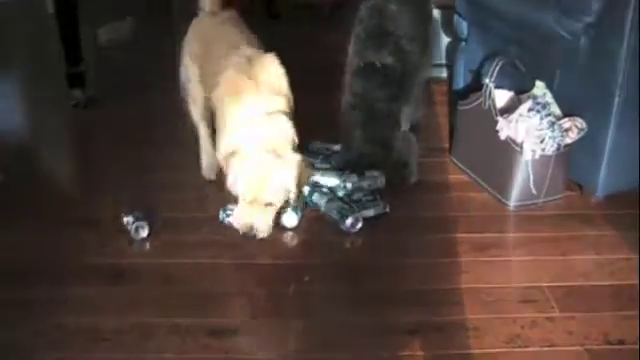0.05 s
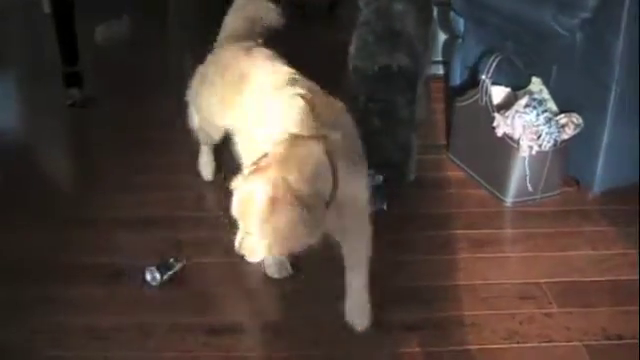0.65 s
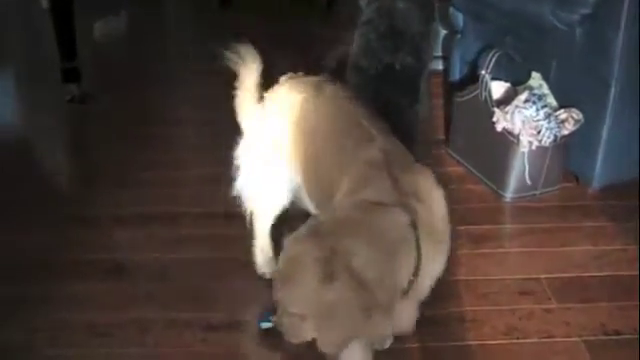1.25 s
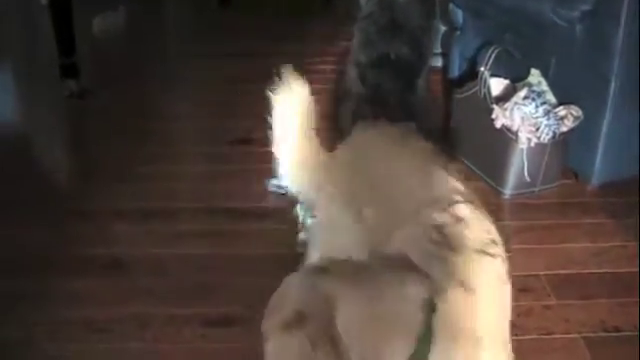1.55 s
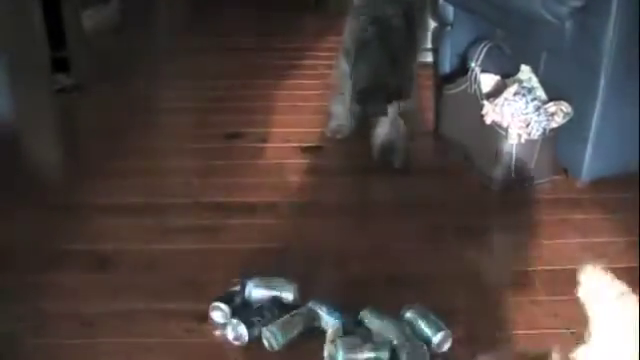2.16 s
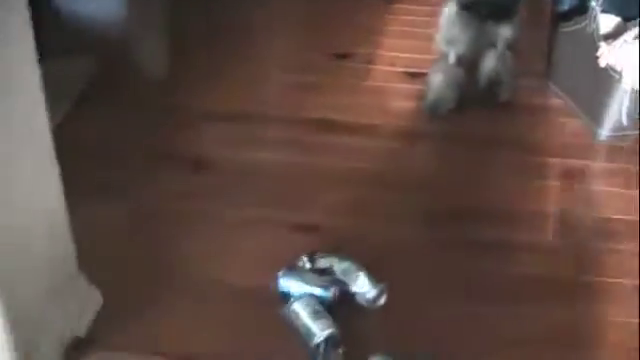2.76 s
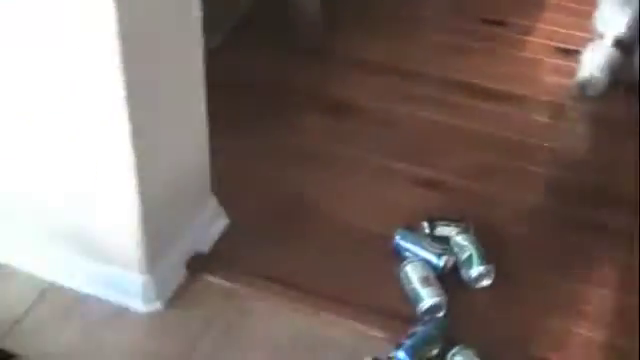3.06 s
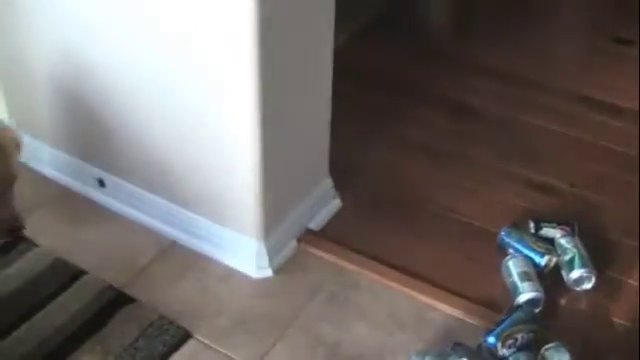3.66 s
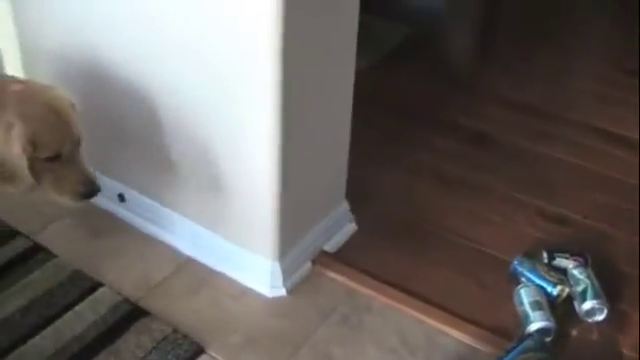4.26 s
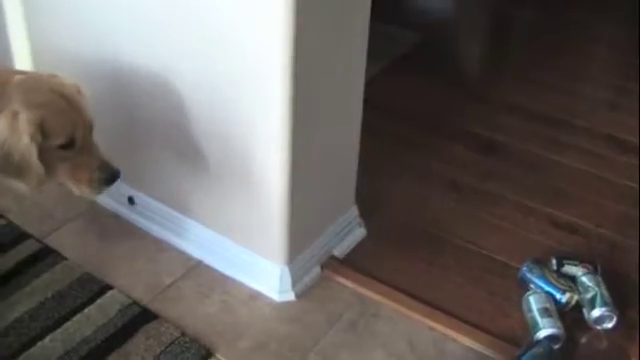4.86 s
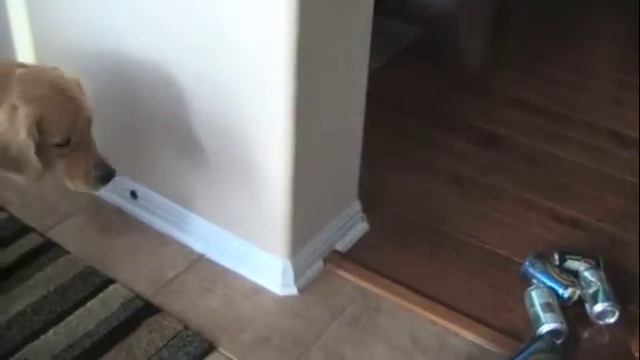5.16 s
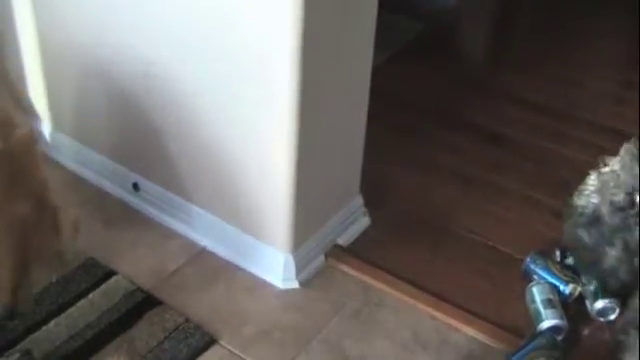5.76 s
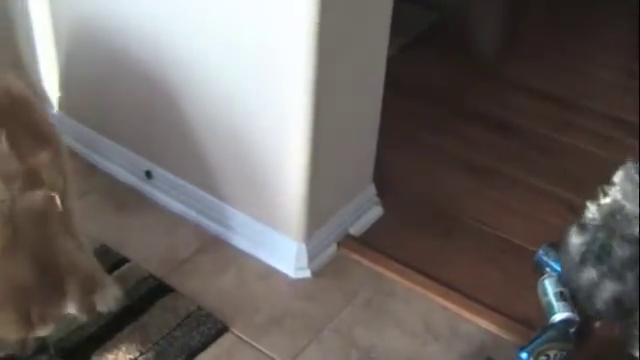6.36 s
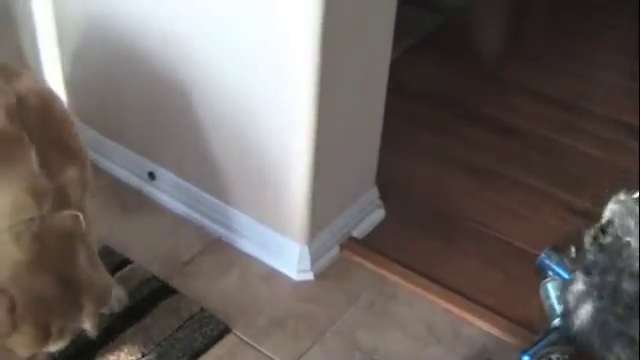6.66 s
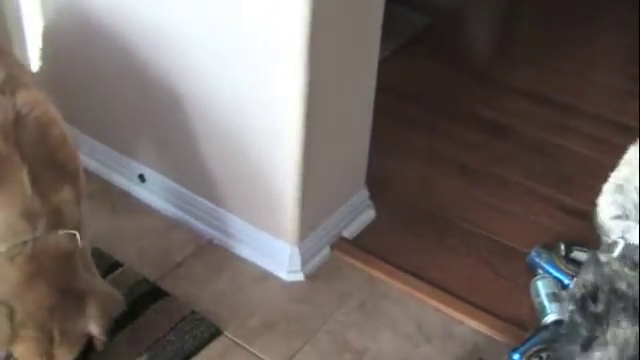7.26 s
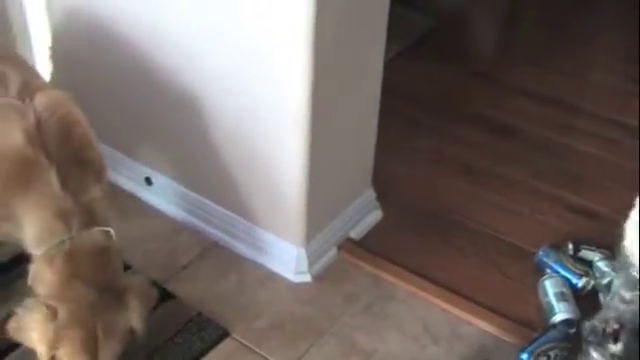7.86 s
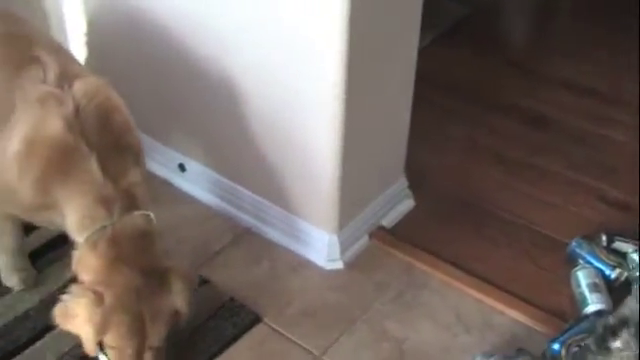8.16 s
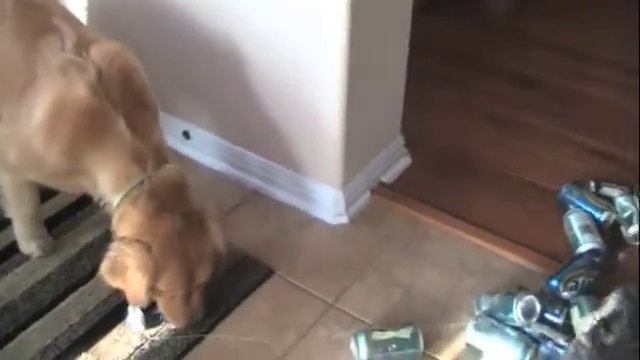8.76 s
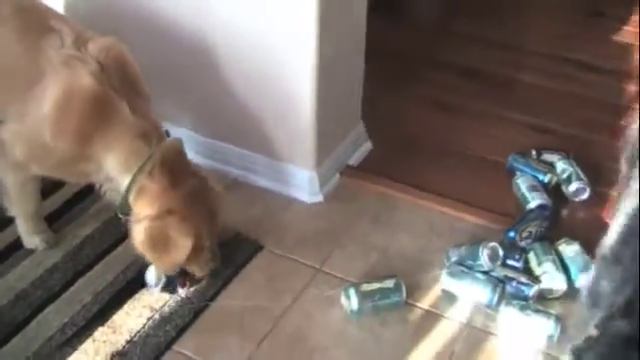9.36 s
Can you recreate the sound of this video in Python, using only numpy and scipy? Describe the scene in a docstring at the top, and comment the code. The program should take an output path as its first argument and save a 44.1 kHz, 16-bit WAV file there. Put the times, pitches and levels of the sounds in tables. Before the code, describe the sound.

A dog knocks empty aluminium cans clattering across a wooden floor; after a lull, single cans rattle and crunch as it chews.

```python
"""In a live room with a wooden floor, a dog ploughs through a heap of empty aluminium cans.
Each impact excites the damped modes of thin walls and stiff rims and thuds on the boards; the cans
tumble, scrape and settle. After a lull come soft paw steps; single cans are nudged into rocking or
buckle as they are chewed, and a few more topple. Diffuse reverberation follows every knock, and a small
camera with a limiter hears it all over ventilation noise and mains hum."""
import sys
import numpy as np
from scipy import signal
from scipy.fft import rfft, irfft, next_fast_len
from scipy.io import wavfile
from scipy.ndimage import uniform_filter1d, minimum_filter1d

SR = 44100
rng = np.random.default_rng(int(sys.argv[2]) if len(sys.argv) > 2 else 0)


def int16_out(signal):
    """Quantize to a 16-bit WAV file."""
    q = np.round(np.clip(np.atleast_2d(signal).T, -1, 1) * 32767)
    wavfile.write(sys.argv[1], SR, q.astype(np.int16))


N = 419391
TIME = np.arange(N) / SR

# distinct impacts: (time [s], level [dB], hardness [0 flat wall to 1 rim], relative floor thud [dB],
# wall frequency [Hz])
IMPACTS = [(0.0472, -13.5, 0.055, -15.5, 1150), (0.4349, -23, 0.25, -32, 940),
           (0.618, -25.5, 0.44, -17, 1220), (0.6272, -21, 0.12, -5, 1050), (0.6936, -17.5, 0.46, -17, 2410),
           (0.8207, -15.5, 0.43, -16, 1470), (0.954, -16, .15, -19, 1160), (1.0598, -18.5, 0.55, -17, 1200),
           (1.457, -20, 0.36, -17, 1180), (1.509, -15, 0.22, -8, 1020), (1.5605, -23, 0.69, -10, 834),
           (1.599, -13, 0.55, -13, 1170), (1.61, -7.5, 0.35, -18, 1660), (1.741, -14, 0.41, -13, 1090),
           (1.801, -14, 0.58, -10, 1506), (1.858, -11, 0.37, -12.5, 1040), (1.9176, -6.5, 0.35, -10, 1410),
           (1.946, -5, 0.25, -26, 3520), (1.969, -6, 0.33, -10.5, 1490), (1.992, -15, 0.69, -22, 2000),
           (2.0306, 0, 0.34, -14, 1820), (2.101, -10, 0.48, -27, 1720), (2.213, -4, 0.4, -23, 1600),
           (2.24, -11, 0.28, -23, 1900), (2.3245, -8.5, 0.57, -11, 1870), (2.38, -4.5, 0.47, -8, 1020),
           (2.391, -12, 0.74, -13, 1490), (2.408, -7, 0.43, -23, 1480), (2.464, -10, 0.5, -24, 2050),
           (2.513, -1, 0.44, -16, 1690), (2.564, -9, .42, -21, 1790), (2.5873, -4.5, 0.24, -16, 1360),
           (2.606, -3, 0.41, -20, 1500), (2.676, -9, 0.31, -9, 1450), (2.722, 1.5, 0.28, -17.5, 1600),
           (2.8261, -13, 0.16, -38, 1110), (2.9144, 1, 0.46, -17, 1150), (2.9938, -19.5, 0.94, -24, 1230),
           (3.002, -13, .42, -20, 1500), (3.0698, -15, 0.74, -17, 3270), (3.081, -4, 0.36, -9.5, 1150),
           (3.154, -11.5, 0.44, -8.5, 1142), (3.246, -15.5, 0.53, -31, 1210), (3.395, -24.5, 0.7, -25, 830),
           (3.423, -32.5, 0.8, -13, 1160), (3.5555, -34.5, 0.6, -24, 1490),
           (4.1916, -47.5, 0.69, -17, 3620), (4.5174, -55, 0.54, -6, 1730), (5.384, -56.5, 0.58, -8, 2390),
           (5.822, -49.5, 0.52, -9, 1960), (6.5781, -18.5, 0.53, -14, 2800), (6.73, -22, 0.27, -17, 616),
           (6.8959, -21, 0.35, -14, 2270), (7.0799, -28, 0.29, -9, 1290), (7.2022, -30, 0.37, -8, 740),
           (7.273, -30.5, 0.3, -16, 1100), (7.3538, -23, 0.084, -23, 796), (7.3721, -29, 0.81, -4, 3150),
           (7.412, -21.5, 0.74, -10, 1110), (7.4387, -15, 0.4, -7, 1400), (7.4594, -16.5, 0.56, -4, 1600),
           (7.4642, -29, 0.56, -19, 1950), (7.4952, -10.5, 0.43, -4, 1840), (7.6563, -9, 0.52, -11, 1740),
           (7.738, -24, 0.7, -17, 2060), (7.7855, -9.5, 0.42, -0.5, 1070), (7.7958, -28.5, 0.74, 13, 1240),
           (9.036, -39, 0.31, -28, 754), (9.1373, -54.5, 0.86, 1, 820)]
# cans that are dragged or bounce free: (time [s], frequency [Hz], level [dB], drag duration [s])
RINGS = [(0.0, 889, -11.5, 0), (0.701, 2580, -27, 0.084), (1.0, 1064, -20.5, 0.02),
         (1.14, 718, -18.5, 0.046), (1.185, 829, -15.5, 0.025), (1.29, 1118, -18, 0.031),
         (1.55, 816, -14.5, 0.034), (1.816, 2654, -12, .002), (1.925, 3450, -10, 0.0054),
         (2.0, 1508, -10.5, 0.015), (2.14, 548, -13.5, 0.013), (2.16, 1222, -12, .02),
         (2.214, 3330, -17, 0.0094), (2.245, 537, -8, 0.0014), (2.25, 3450, -17, 0.017),
         (2.465, 2080, -8, 0), (2.503, 3110, -11.5, 0.015), (2.611, 1101, -11, 0.093),
         (2.7, 7920, -13, 0.0017), (2.721, 2420, -9, 0), (2.724, 1240, -9.5, 0.021), (3.084, 559, -19, .02)]
# settling cans touch rim to rim: (time [s], level [dB])
RIM_TOUCHES = [(3.554, -18), (3.759, -22), (3.930, -28), (4.043, -40)]
# modes of the stiff rim: (frequency [Hz], level [dB])
RIM_RESONANCES = [(6700, -2), (7140, 2), (7810, -2), (8780, -1), (9300, -10)]
# the heap spills and is pushed twice more; one envelope a push, ahead of the band trims:
# (time [s], level [dB], relative floor rumble [dB], relative brightness [dB])
PUSH_ENVELOPES = [
    [(0, -11, -53, -9.5), (0.05, -12, -18.5, -7), (0.13, -21, -24, -9.5), (0.3, -23, -15, -9),
     (0.41, -31.5, -4, -9), (0.47, -24, -13, -11), (0.58, -34.5, -4, -8)],
    [(0.63, -22.5, -7, -2.5), (0.69, -20, -25, -6), (0.73, -18.5, -12, 0.5), (0.81, -20, -25, -1.5),
     (0.98, -20.5, -9.5, -1.5), (1.12, -12.5, -14, -3.5), (1.25, -16.5, -16, -8.5), (1.45, -18.5, -6.5, -3),
     (1.6, -13.5, -8, -0.5), (1.78, -11, -17, -0.5), (1.88, -13, -10, -2), (2.03, -12, -8, -0.5)],
    [(2.08, -14.5, -13, 2.5), (2.18, -8.5, -17, -6), (2.34, -10.5, -6.5, 2.5), (2.48, -8.5, -12.5, 1.5),
     (2.73, -8, -13, 1), (2.88, -9.5, -15, -2), (2.97, -6, -16, -2), (3.15, -7, -23.5, -3),
     (3.35, -24.5, -21.5, 1), (3.46, -31.5, -8, -3), (3.75, -44.5, -16, -4), (3.95, -63.5, -14, 13)],
]
# later jostles of a few cans, and two faint high swishes, perhaps the dog sniffing; the same columns
JOSTLES_AND_SWISHES = [
    [(4.09, -52.5, -5, 4), (4.17, -49, 2, 2), (4.23, -62, -7, -6)],
    [(6.16, -63, 0, 8), (6.22, -59, 0, 6.6)],
    [(6.38, -60.5, 0, 10.6), (6.45, -61, 0, 8)],
    [(7.16, -37.5, -4, -3.5), (7.412, -32, -2, -13), (7.544, -27, 0, -4), (7.792, -38, -14, 3),
     (7.93, -36, -7, -15)],
    [(8.18, -40.5, 0.5, 0.5), (8.264, -40.5, 8, 0), (8.33, -47, -4, -7)],
    [(9.18, -46.5, 3, -1), (9.296, -43, 3.5, 1.5), (9.5, -53, 3.4, -14)],
]
# air and wall modes of an empty can: (frequency [Hz], level [dB], t60 [s])
CAN_RESONANCES = [(251.6, -3.5, 0.044), (354, -12.5, 0.1), (418, -10.5, 0.073), (522.6, -2.5, 0.17),
                  (694, -4, 0.93), (850, 1, 0.52), (958, 5.5, 0.068), (1068, 6, 0.088), (1153, 0, 0.39),
                  (1263, 9.5, 0.06), (1472, 3, 0.11), (1644, -1, 0.11), (1946, -14, 0.17),
                  (2235, -6, 0.083), (2730, -7.5, 0.42), (3500, -3, 0.056), (5955, -8.5, 0.029),
                  (7190, -13, 0.012), (7670, -18, 0.019), (8120, -12, 0.037), (9120, -6, 0.084),
                  (9900, -41, 0.03)]
# spectrum of a collision's dry crack: (frequency [Hz], gain [dB])
CRACK_SPECTRUM = [(71, -56), (120, -52), (243, -13), (304, -22), (437, -9), (524, 5.5), (629, -0.5),
                  (802, 5), (1230, 6.5), (1800, -3.5), (3500, -9.5), (4840, -17.5), (6960, -15),
                  (9240, -19), (15000, -16.5)]
# a lone can rocks on its side: (time [s], level [dB], favoured frequency [Hz], t60 of the rocking [s])
ROCKINGS = [(6.578, -40, 1500, 0.018), (6.73, -28.5, 595, .04), (6.896, -27, 1500, .03),
            (7.08, -34.5, 1200, .05), (7.163, -39, 1100, .1), (7.203, -25.5, 780, 0.051),
            (7.235, -34, 850, .1), (7.268, -33, 900, 0.12)]
# modes of that can: (frequency [Hz], level [dB], t60 [s])
LONE_CAN_RESONANCES = [(503, 2, 0.18), (650, 3, 0.088), (755, 2.5, .18), (860, 7.5, 0.15), (965, -1, 0.044),
                       (1145, -4, .2), (1247, 2.5, 0.19), (1405, -3, .25), (2150, 0, .2), (2730, -6, .1),
                       (5200, 12, .4)]
# a can buckles in the jaws: (time [s], level [dB], rise [s], t60 [s], wall frequency [Hz],
# relative hollow body [dB], relative crackle [dB])
BITES = [(7.872, -21.5, .008, 0.12, 1400, -9, -8.5), (7.922, -24.5, 0.017, .09, 1300, -1.5, -9.5),
         (8.18, -33, .008, 0.086, 1700, -6, -9), (8.196, -25, .003, 0.075, 1500, 3.5, -10),
         (8.224, -24, .004, 0.046, 1640, -5.5, -7), (8.266, -33, .004, 0.048, 1700, -10, 1),
         (8.282, -33.5, 0.0066, 0.12, 1400, -8, -23), (8.429, -20, .001, 0.084, 1250, -7, -13),
         (8.492, -14, 0.014, 0.045, 1050, 1.5, -7), (8.528, -20, 0.0054, 0.14, 930, -7, -29),
         (9.18, -36.5, 0.044, 0.14, 1420, -3.5, -4), (9.343, -32.5, 0.0053, 0.13, 1390, -10, -2),
         (9.435, -39, .003, 0.074, 1590, -12, -12)]
# soft paw falls: (time [s], level [dB], thump frequency [Hz])
PAW_FALLS = [(6.04, -49, 231), (6.226, -48.5, 230), (7.787, -37.5, 190), (8.497, -42.5, 220),
             (9.279, -41, 390)]
# bands of the room's reverberation: (frequency [Hz], t60 [s], gain on the direct sound [dB])
REVERB_BANDS = [(150, 0.97, -5), (466, 0.71, -5.5), (990, 0.74, -0.5), (2620, 0.71, -3.5),
                (6700, 0.58, -1.5), (15700, 0.13, -1.5)]
# width of diffuse sound at the microphone pair: (frequency [Hz], side gain [dB])
DIFFUSE_WIDTH = [(100, -8), (500, -3), (1000, -2.5), (2000, 3.5), (4000, 4.5), (8000, 3.5), (12000, 13)]
# spectrum of ventilation noise and hiss: (frequency [Hz], gain [dB])
AIR_SPECTRUM = [(53, -47), (90, -6.5), (114, -9.5), (214, -1), (276, -1), (439, -8), (467, -1.5), (508, -8),
                (683, -11), (809, -14.5), (1880, -23), (4670, -28), (14000, -36.5)]
# mains harmonics: (frequency [Hz], rms level [dB])
HUM_PARTIALS = [(60, -54), (120, -59)]
# balance of the microphone pair: (frequency [Hz], left minus right [dB])
STEREO_BALANCE = [(250, -0.3), (1000, 0.6), (2000, 2), (4500, 0), (8000, 4.5), (12000, 1.3)]


def knock(thud_db, clank_db, tick_db, hz, t60, snap=3.4, soft_s=0.13, rim_hz=7700):
    """Forced vibration: a snap and a chatter of metal on wood drive the floor, thin wall and stiff rim."""
    t = np.arange(SR // 10) / SR
    force = rng.standard_normal(len(t)) * fade(t, t60)
    force[0] += snap * np.exp(-(t60 / soft_s) ** 2)  # only short, hard blows snap cleanly
    thud = unit(band(force, 349, 564))
    wall = unit(resonate(band(force, 535, 2650), hz, q=3))
    clank = unit(wall + undb(-3) * unit(band(force, 820, 2780)))
    rim = unit(resonate(band(force, 4000, 12000), rim_hz, q=3))
    tick = unit(unit(band(force, 4700, 15500, order=3)) + undb(-4) * rim)
    # levels are those of the knock's energy packed into 10 ms
    return (undb(thud_db) * thud + undb(clank_db) * clank + undb(tick_db) * tick) / np.sqrt(10)


def impact(db, hardness, thud_db, hz, rebound_s=0.0075, rebound_db=-8):
    """Contact stiffness: nearer the rim, a blow is shorter and brighter and rebounds more strongly."""
    flat_t60, rim_t60 = 0.2, 0.011
    flat_tick_db, rim_tick_db = -29.5, 16.5
    t60 = rim_t60 + (flat_t60 - rim_t60) * (1 - hardness) ** 4
    tick_db = flat_tick_db + (rim_tick_db - flat_tick_db) * hardness
    first, second = (knock(db + thud_db, db, db + tick_db, hz, t60) for _ in range(2))
    delayed = np.r_[np.zeros(int(rebound_s * SR)), second][:len(first)]
    return first + hardness * undb(rebound_db) * delayed


def ringing(hz, drag_s, roughness=1.2, waver=0.044, onset_s=0.004):
    """Friction sustains a wall mode, which then decays freely; rocking modulates it at random."""
    t = np.arange(SR // 2) / SR
    rocking = lowpass(rng.standard_normal((2, len(t))), np.clip(waver * hz, 5, 2000))
    phase = 2 * np.pi * hz * t
    sidebands = unit(rocking[0] * np.sin(phase) + rocking[1] * np.cos(phase))
    tone = unit(np.sin(phase) + roughness * sidebands)
    contact = np.sin(np.pi / 2 * np.minimum(t / onset_s, 1)) ** 2
    t60 = 0.15 * (1000 / hz) ** 0.16  # higher modes die sooner
    return tone * contact * fade(np.maximum(t - drag_s, 0), t60)


def rim_tap(t60=0.024, rise_s=0.00048, detune=0.025, scuff_db=-2):
    """Free vibration: a light scuff leaves the high modes of the stiff rim tinkling."""
    t = np.arange(SR // 5) / SR
    ring = 0
    for hz, db in RIM_RESONANCES:
        detuned = hz * (1 + detune * rng.standard_normal())
        ring += undb(db) * np.sin(2 * np.pi * (detuned * t + rng.random()))
    scuff = unit(band(rng.standard_normal(len(t)), 6300, 9800))
    return unit(unit(ring) + undb(scuff_db) * scuff) * fade(t, t60) * (1 - np.exp(-t / rise_s))


def can_response(dent=0.02183, crack_db=-1, crack_t60=0.11):
    """Modal superposition: a can's modes, weighted by where the blow lands, sound with a dry crack."""
    t = np.arange(SR // 4) / SR
    push, ring = signal.unit_impulse(len(t)), 0
    for hz, db, t60 in CAN_RESONANCES:
        shift, weight = rng.standard_normal(2)
        # dents and dregs detune each can, its higher modes most
        detuned = hz * (1 + dent * min(hz / 1000, 6) * shift)
        ring += undb(db) * np.tanh(weight) * mode(push, detuned, t60) / np.sqrt(t60)
    crack = colour(rng.standard_normal(len(t)) * fade(t, crack_t60), CRACK_SPECTRUM)
    return unit(ring) + undb(crack_db) * unit(crack)


def collisions(cans=130, hits_per_can=7, spread_db=4, restitution=0.6):
    """Inelastic collisions: each random hit is followed by ever quicker, weaker rebounds."""
    out = np.zeros(N)
    for _ in range(cans):
        response = can_response()
        for moment, softness, height in rng.random((hits_per_can, 3)):
            s = moment * N / SR
            strength = undb(-spread_db * np.log(softness + 0.19))
            gap_s = 0.012 + 0.05 * height
            for bounce in range(3):
                add(out, strength * restitution ** bounce * response, s)
                s += gap_s * restitution ** bounce
    return out


def heap(mid_trim_db=-4, low_trim_db=-4, high_trim_db=-3):
    """Incoherent summation: collisions merge; heavy shoves rumble the boards, hard ones are bright."""
    clatter = np.roll(collisions(), N // 2)  # the cans are already in motion at the start
    low = band(clatter, 153, 714, order=4)
    mid = band(clatter, 557, 2050, order=4)
    high = band(clatter, 2000, 10600, order=3)
    out = np.zeros(N)
    # kept faint and bright, the same texture also makes the two swishes
    for envelope in [*PUSH_ENVELOPES, *JOSTLES_AND_SWISHES]:
        s, db, rumble_db, bright_db = np.transpose(envelope)
        out += follow_level(mid, s, db + mid_trim_db)
        out += follow_level(low, s, db + rumble_db + low_trim_db)
        out += follow_level(high, s, db + bright_db + high_trim_db)
    return out


def rocking_can(centre_hz, rock_t60, width_octaves=0.64, gap_s=0.009, taps=14):
    """Impulse-train excitation: a can rocks in uneven, fading taps; the touch point favours some modes."""
    t = np.arange(SR // 2) / SR
    push, ring = signal.unit_impulse(len(t)), 0
    gaps, sizes = rng.random((taps, 2)).T
    at = np.minimum(np.cumsum(gap_s * (0.5 + gaps)) * SR, len(t) - 1).astype(int)
    push[at] += sizes * fade(t[at], rock_t60)
    for hz, db, t60 in LONE_CAN_RESONANCES:
        coupling = np.exp(-0.5 * (np.log2(hz / centre_hz) / width_octaves) ** 2)
        ring += undb(db) * coupling * mode(push, hz, t60)
    ring = band(ring, 400, 9000)  # so small a body radiates no bass
    return ring / np.std(ring[:SR // 50])


def crunch(rise_s, t60, hz, hollow_db, crackle_db, creases_per_s=3500, band_ratio=1.67):
    """Buckling: thin metal gives way in a swarm of tiny creases that sound the wall and hollow body."""
    t = np.arange(SR // 4) / SR
    bite = np.minimum(t / rise_s, 1) * fade(np.maximum(t - rise_s, 0), t60)
    creases = rng.standard_normal(len(t)) * (rng.random(len(t)) < creases_per_s / SR)
    wall = unit(band(creases, hz / band_ratio, hz * band_ratio, order=3))
    hollow = unit(band(creases, 330, 590, order=3))
    crackle = unit(band(creases, 1900, 6100, order=1))
    return bite * (wall + undb(hollow_db) * hollow + undb(crackle_db) * crackle)


def paw_step(hz, rise_s=0.0036, t60=0.046):
    """Compliant contact: a padded foot drives only the low frequencies of the boards."""
    t = np.arange(SR // 10) / SR
    push = rng.standard_normal(len(t)) * fade(t, t60) * (1 - np.exp(-t / rise_s))
    return unit(band(push, hz * 0.55, hz * 1.37))


def reflections(build_s=0.00077):
    """Frequency-dependent absorption: each band of a diffuse tail dies at its own rate."""
    t = np.arange(SR) / SR
    spectrum, hz = rfft(rng.standard_normal(SR)), np.fft.rfftfreq(SR, 1 / SR)
    centres, tail = np.transpose(REVERB_BANDS)[0], 0
    for (_, t60, db), pick in zip(REVERB_BANDS, np.eye(len(REVERB_BANDS))):
        noise = irfft(spectrum * along(hz, np.c_[centres, pick]), SR)
        decay = fade(t, t60) * (1 - np.exp(-t / build_s))
        tail += undb(db) * noise * decay / np.linalg.norm(decay)
    return tail


def room(direct, spots=4, move_hz=2.3, side_db=-8):
    """Reflections depend on source position, so they change as the cans move; returns mid and side."""
    mid = side = 0
    for spot in range(spots):
        # neighbouring spots hand over to each other at constant power
        here = direct * np.maximum(0, np.cos(2 * np.pi * (move_hz * TIME - spot / spots)))
        mid += signal.oaconvolve(here, reflections())[:N]
        side += signal.oaconvolve(here, reflections())[:N]
    return mid, undb(side_db) * colour(side, DIFFUSE_WIDTH)


def ventilation(air_db=-48.5, rumble_db=-68):
    """Diffuse noise: low ventilation sound and faint hiss, uncorrelated between mid and side."""
    mid, side = (undb(air_db) * unit(colour(rng.standard_normal(N), AIR_SPECTRUM)) for _ in range(2))
    rumble = undb(rumble_db) * unit(band(rng.standard_normal(N), 35, 107))
    return mid + rumble, colour(side, DIFFUSE_WIDTH)


def mains_hum(swell_s=1.055, crest_s=5.06, depth=0.17):
    """Amplitude modulation: the mains tone and its octave slowly swell and sink."""
    hum = sum(np.sqrt(2) * undb(db) * np.sin(2 * np.pi * hz * TIME) for hz, db in HUM_PARTIALS)
    return hum * (1 + depth * np.cos(2 * np.pi * (TIME - crest_s) / swell_s))


def undb(db):
    """Decibels to amplitude ratio."""
    return 10 ** (np.asarray(db) / 20)


def unit(x):
    """Normalisation to rms 1."""
    return x / np.sqrt(np.mean(x ** 2) + 1e-20)


def fade(t, t60):
    """Exponential decay, 60 dB down after t60 seconds."""
    return np.exp(-np.log(1000) * t / max(t60, 1e-3))


def add(out, x, s):
    """Superposition of x on out at time s."""
    i = int(np.clip(s * SR, 0, N - 1))
    out[i:i + len(x)] += x[:N - i]


def lowpass(x, hz, order=2):
    """Causal low-pass filtering."""
    return signal.sosfilt(signal.butter(order, hz, fs=SR, output="sos"), x)


def band(x, lo_hz, hi_hz, order=2):
    """Causal band-pass filtering."""
    return signal.sosfilt(signal.butter(order, [lo_hz, hi_hz], "band", fs=SR, output="sos"), x)


def resonate(x, hz, q):
    """Resonance of bandwidth hz / q."""
    return signal.lfilter(*signal.iirpeak(hz, q, fs=SR), x)


def mode(push, hz, t60):
    """Damped harmonic oscillator: each push sets off a decaying sine."""
    turn, keep = 2 * np.pi * hz / SR, fade(1 / SR, t60)
    return signal.lfilter([0, np.sin(turn)], [1, -2 * keep * np.cos(turn), keep ** 2], push)


def along(hz, points):
    """Log-frequency interpolation of (frequency [Hz], value) points."""
    f, value = np.transpose(points)
    return np.interp(np.log(hz + 1), np.log(f), value)


def colour(x, points, share=1):
    """Zero-phase filtering by a (frequency [Hz], gain [dB]) curve."""
    n = next_fast_len(len(x))
    gain = undb(share * along(np.fft.rfftfreq(n, 1 / SR), points))
    return irfft(rfft(x, n) * gain, n)[:len(x)]


def follow_level(x, s, db, smooth_s=0.11):
    """Envelope shaping: the running rms of x follows a curve and is silent outside its span."""
    power = uniform_filter1d(uniform_filter1d(x ** 2, int(smooth_s * SR)), int(smooth_s * SR / 2))
    target = np.interp(TIME, np.r_[s[0] - 0.02, s, s[-1] + 0.04], np.r_[0, undb(db), 0])
    return x * target / np.sqrt(np.abs(power) + 1e-12)


def scene():
    """Direct and diffuse fields add: the cans lie ahead and the room answers from all sides."""
    direct = np.zeros(N)
    for s, db, hardness, thud_db, hz in IMPACTS:
        add(direct, impact(db, hardness, thud_db, hz), s)
    for s, hz, db, drag_s in RINGS:
        add(direct, undb(db) * ringing(hz, drag_s), s)
    for s, db in RIM_TOUCHES:
        add(direct, undb(db) * rim_tap(), s)
    direct += heap()
    for s, db, hz, rock_t60 in ROCKINGS:
        add(direct, undb(db) * rocking_can(hz, rock_t60), s)
    for s, db, rise_s, t60, hz, hollow_db, crackle_db in BITES:
        add(direct, undb(db) * crunch(rise_s, t60, hz, hollow_db, crackle_db), s)
    for s, db, hz in PAW_FALLS:
        add(direct, undb(db) * paw_step(hz), s)
    air_mid, air_side = ventilation()
    room_mid, room_side = room(direct)
    mid, side = direct + room_mid + air_mid + mains_hum(), room_side + air_side
    left = colour(mid + side, STEREO_BALANCE, share=1 / 2)
    right = colour(mid - side, STEREO_BALANCE, share=-1 / 2)
    return np.array([left, right])


def record(dry, rolloff_hz=13500, top_hz=15800):
    """Band and peak limiting: the highest treble is rolled off; a limiter ducks after loud knocks."""
    threshold_db, ratio, attack_s, recover_db_per_s = -4, 7.8, 0.00089, 58.5
    heard = lowpass(dry, rolloff_hz, order=4)
    peak_db = 20 * np.log10(np.abs(heard).max(axis=0) + 1e-9)
    excess_db = np.maximum(0, peak_db - threshold_db) * (1 - 1 / ratio)
    recovery_db = recover_db_per_s * TIME
    duck_db = np.maximum.accumulate(excess_db + recovery_db) - recovery_db
    keep = np.exp(-1 / (attack_s * SR))
    heard *= undb(-signal.lfilter([1 - keep], [1, -keep], duck_db))
    # peaks that outrun the attack are held at full scale
    hold = int(0.002 * SR)
    ceiling_gain = 1 / np.maximum(1, np.abs(heard).max(axis=0))
    heard *= uniform_filter1d(minimum_filter1d(ceiling_gain, hold), hold)
    return signal.sosfilt(signal.ellip(8, 0.2, 70, top_hz, fs=SR, output="sos"), heard)


dry = scene()
out = record(dry)
int16_out(out)
```